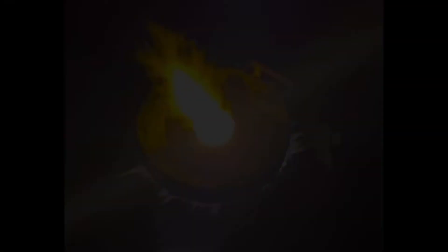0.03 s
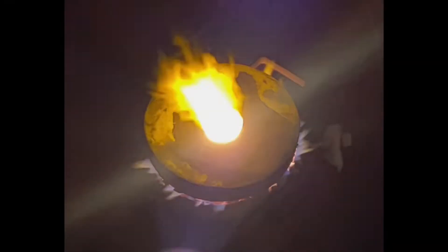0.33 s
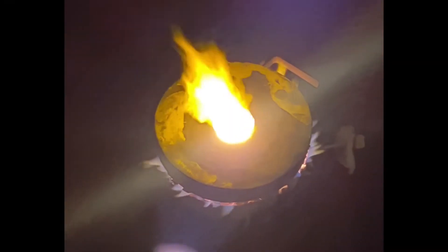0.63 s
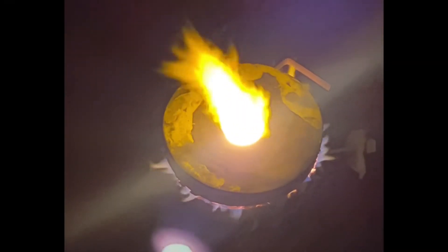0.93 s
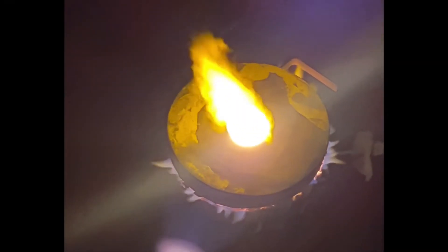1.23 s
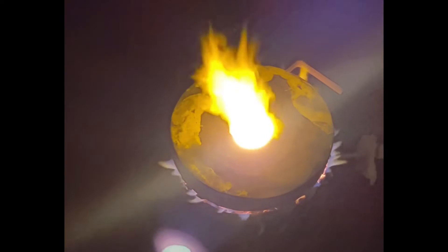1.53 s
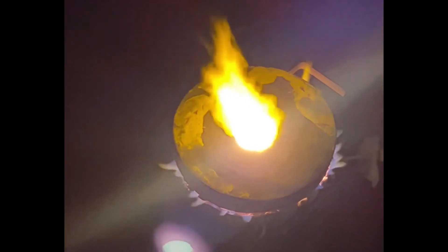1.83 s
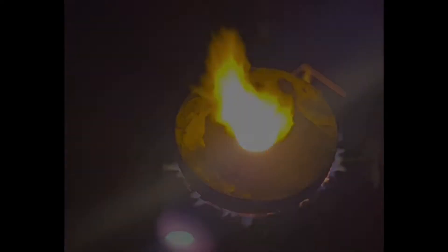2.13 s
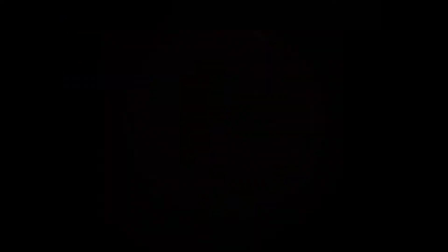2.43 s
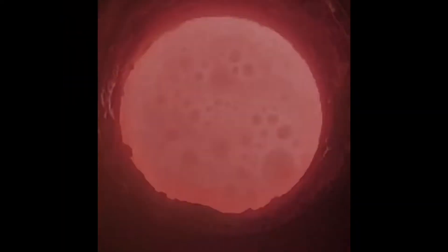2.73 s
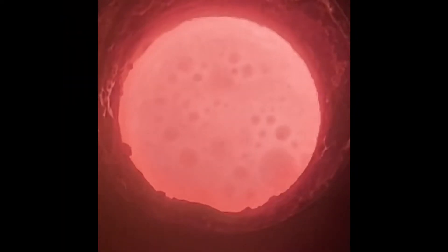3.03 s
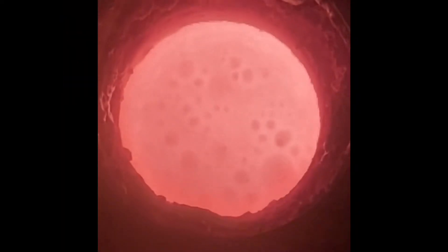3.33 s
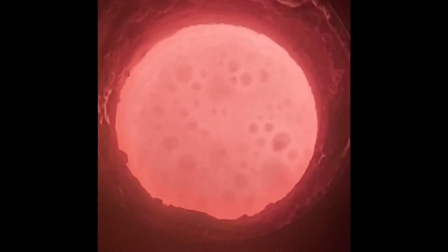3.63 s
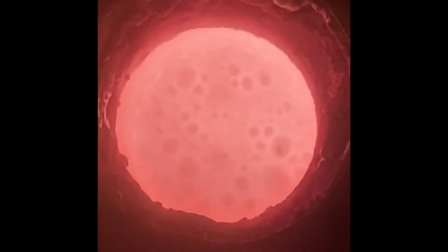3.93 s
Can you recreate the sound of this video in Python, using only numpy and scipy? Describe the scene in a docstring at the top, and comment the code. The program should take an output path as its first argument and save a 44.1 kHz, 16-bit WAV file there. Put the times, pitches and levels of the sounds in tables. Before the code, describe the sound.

A furnace flame roars in a workshop, booming and throbbing, with hissing air and a thin blower whine. Heard first beside the flame, then from above the crucible, where the roar stays strong but hiss and whine are much weaker.

```python
"""Forced-air melting furnace

A turbulent flame roars in a workshop, booming and throbbing in its chamber, while air hisses
and a motor and a blower whine at multiples of their shaft rates. It is heard first from beside
the flame; after a quick fade it is heard from over the crucible, where the roar is as strong
but hiss and whine are much weaker."""
import sys
import numpy as np
from scipy import signal
from scipy.fft import rfft, irfft
from scipy.io import wavfile
from scipy.ndimage import uniform_filter1d

SR = 44100
rng = np.random.default_rng(int(sys.argv[2]) if len(sys.argv) > 2 else 0)


def wrap_up_sound(samples):
    """Save the sound to the file named by the first command line argument, as 16-bit audio."""
    columns = np.atleast_2d(samples).T
    # keep every value between -1 and 1, then stretch to whole-number steps
    tamed = np.clip(columns, -1, 1)
    steps = np.round(tamed * 32767).astype(np.int16)
    wavfile.write(sys.argv[1], SR, steps)


N = 176400
TIME, BIN_HZ = np.arange(N) / SR, np.arange(N // 2 + 1) * SR / N
BESIDE, ABOVE = 0, 1  # listening places: beside the flame, above the crucible
LEFT_RIGHT = np.array([[1], [-1]])


def undb(db):
    """Decibels to gain."""
    return 10 ** (np.asarray(db) / 20)


def fader(rows):
    """Gain that rides straight lines between (seconds, dB) points."""
    return undb(np.interp(TIME, *np.array(rows).T))


def swell(rows):
    """A fader ride scaled to unit mean power between its first and last points."""
    gain = fader(rows)
    start, end = int(rows[0][0] * SR), int(rows[-1][0] * SR)
    return gain / np.sqrt(np.mean(gain[start:end] ** 2))


def across_spectrum(table, column=1):
    """Spread a table column over all frequencies, on a log axis."""
    rows = np.array(table)
    return np.interp(np.log(BIN_HZ + 1), np.log(rows[:, 0]), rows[:, column])


def drift(rate_hz):
    """Smooth random motion with a spread of 1, taking rate_hz new values a second."""
    hold = int(SR / rate_hz)
    steps = np.repeat(rng.standard_normal(400), hold)[:N]
    smooth = uniform_filter1d(uniform_filter1d(steps, hold), hold)
    return smooth / np.std(smooth)


def colour(spectrum, eq, level_db):
    """Noise shaped by an EQ curve, falling steeply past its ends, and set to an RMS level."""
    hz = BIN_HZ + 1
    skirts = 1 / np.sqrt((1 + (eq[0][0] / hz) ** 20) * (1 + (hz / eq[-1][0]) ** 20))
    noise = irfft(spectrum * undb(across_spectrum(eq)) * skirts, N)
    return noise * undb(level_db) / np.std(noise)


# Stereo image of the flame and air at each place. Each row: frequency in Hz, phase of side
# against mid in radians, share of direct sound in the side from 0 to 1.
IMAGE_BESIDE = [(60, 1, .3), (280, -2, 0.17), (800, -0.5, 0.77), (1340, -2, 0.87), (1800, -6, 0.4),
                (2400, 4, .5), (2900, -1.5, .55), (3500, -4, .55), (6000, -4.5, .65), (10000, -4.5, .65)]
IMAGE_ABOVE = [(60, -1.5, .3), (280, -1.4, 0.46), (550, -0.7, 0.61), (800, -2, .5), (1150, -3.5, 0.45),
               (2400, -5, .7), (6000, -4.5, .55), (10000, -4.7, .6)]


def turbulence(place, mid_eq, side_eq, mid_db, side_db):
    """Turbulent noise at two ears: part arrives directly, part is scattered by the workshop."""
    image = (IMAGE_BESIDE, IMAGE_ABOVE)[place]
    direct, scattered = rfft(rng.standard_normal((2, N)))
    share = np.clip(across_spectrum(image, column=2), 0, 1)
    side = share * np.exp(1j * across_spectrum(image)) * direct + np.sqrt(1 - share ** 2) * scattered
    return colour(direct, mid_eq, mid_db) + LEFT_RIGHT * colour(side, side_eq, side_db)


def whine(place, tones, shaft_hz, waver_db):
    """Multiples of a slightly wandering shaft rate, each wavering in the moving hot air."""
    speed_hz = shaft_hz * (1 + 0.00026 * drift(rate_hz=5.02))
    shaft_angle = 2 * np.pi * np.cumsum(speed_hz) / SR
    sound = np.zeros((2, N))
    for multiple, *levels_db, lead, pan_db in tones:
        phase = multiple * shaft_angle + rng.uniform(0, 2 * np.pi) + 0.43 * drift(rate_hz=14)
        waver = undb(waver_db * drift(rate_hz=14))
        waver *= np.sqrt(2 / np.mean(waver ** 2))  # gives the wavering sine unit power
        gain = undb(levels_db[place] + LEFT_RIGHT * pan_db / 2)
        sound += gain * waver * np.sin(phase + LEFT_RIGHT * lead / 2)
    return sound


# The motor's partials. Each row: multiple of the shaft rate, level beside in dB, level above in dB,
# left ear's phase lead in radians, left minus right in dB.
MOTOR_TONES = [(14, -46.5, -55, -.9, -4), (19, -49.5, -60, -1.3, -2), (21, -43.5, -58, -1.6, -4),
               (33, -53.5, -55, .6, -3), (35, -51.5, -60.5, 1, -5), (37, -53.5, -71, 1.7, -5),
               (38, -55.5, -75, 2.2, -5), (39, -55, -74, 2.6, -4), (40, -55, -76, 2.7, -2),
               (41, -53.5, -76, 2.8, 0), (42, -53.5, -76, 2.8, 0), (46, -66, -66, 1.5, 0)]


def motor(place):
    """The spinning motor sings a thin, steady cluster of shaft harmonics."""
    return whine(place, MOTOR_TONES, shaft_hz=59.83, waver_db=2)


# The blower's partials. Each row: multiple of the shaft rate, level beside in dB, level above in dB,
# left ear's phase lead in radians, left minus right in dB.
BLOWER_TONES = [(51, -58, -68, 1.5, 0), (53, -56, -52.5, .6, 0), (55, -40.3, -69, .6, 1),
                (56, -49.5, -68, .6, 1), (57, -57.5, -78, .7, 1), (106, -68, -73, 1.6, 0),
                (109, -65, -71, 1.6, 0), (110, -57.5, -78, 1.6, 0), (111, -56, -78, 1.6, 0),
                (112, -45.8, -62, 1.7, 0), (114, -65, -74, 1.7, 0)]
# Fader rides for its whine and whistle, one list per place. Each row: time in seconds, relative dB.
WHINE_RIDE = [
    [(0.0, -4), (0.08, -1), (0.3, -1.5), (0.55, -3), (0.7, -2.5), (0.85, -1.5), (1.12, 1.5), (1.22, 0.5),
     (1.42, 0.5), (1.51, 2), (1.65, 1.2), (1.95, -0.5), (2.04, -2.5), (2.25, 3.5), (2.35, -1)],
    [(2.42, -4.5), (2.65, 1), (2.82, -1), (2.98, -1.5), (3.17, 0.5), (3.35, -3), (3.47, 2), (3.6, -3.5),
     (3.7, -2.5), (3.78, 2.5), (3.92, -7.5), (3.98, -3.5)],
]
WHISTLE_RIDE = [
    [(0.0, -6), (0.16, 3), (0.43, -7), (0.51, 3.5), (0.59, 1), (0.68, 1), (0.8, -12), (0.94, 1), (0.99, -6),
     (1.045, 9), (1.085, -6), (1.12, 8), (1.17, -1), (1.26, 2), (1.41, -9), (1.5, 3.5), (1.69, -5),
     (1.76, 5), (1.82, -2.5), (2.02, -4), (2.12, 6.5), (2.2, -7), (2.28, 8), (2.35, -4)],
    [(2.42, 0.5), (2.6, -8), (3.15, -5.5), (3.23, 5), (3.3, -1), (3.44, 3), (3.55, 0.5), (3.78, 6),
     (3.98, -11)],
]


def blower(place, shaft_hz=74.79, waver_db=1.14, split_multiple=80):
    """The blower's blades whine, with a whistle about an octave up that swells on its own."""
    lower = [row for row in BLOWER_TONES if row[0] < split_multiple]
    upper = [row for row in BLOWER_TONES if row[0] > split_multiple]
    blades = whine(place, lower, shaft_hz, waver_db) * swell(WHINE_RIDE[place])
    whistle = whine(place, upper, shaft_hz, waver_db) * swell(WHISTLE_RIDE[place])
    return blades + whistle


def metal_reflections(sound, echo_db=-12.5, decay_s=0.0072):
    """Early reflections off nearby metal add a hollow, rippled colour."""
    tail = rng.standard_normal(N) * np.exp(-TIME / decay_s)
    response = 1 + undb(echo_db) * rfft(tail / np.linalg.norm(tail))
    return irfft(rfft(sound) * response, N) / np.sqrt(1 + undb(echo_db) ** 2)


# Mid and side EQ of the hiss at each place. Each row: frequency in Hz, relative level in dB.
HISS_MID_BESIDE = [(900, -65.5), (1300, -69.5), (1450, -64.5), (1650, -70), (2000, -72), (2350, -77),
                   (2700, -85), (2950, -72), (3500, -71.5), (3700, -76.5), (4200, -78.5), (4700, -80),
                   (5450, -75), (6400, -74), (7500, -79), (8400, -75.5), (9200, -83), (10200, -83.5),
                   (11200, -97), (12500, -110)]
HISS_SIDE_BESIDE = [(900, -73), (1300, -72), (1470, -72.5), (1680, -79.5), (2100, -83), (2500, -73),
                    (2750, -77), (3050, -71), (3500, -73.5), (3800, -76.5), (4400, -77), (4850, -71),
                    (5200, -91), (6500, -82), (8300, -81.5), (9200, -81), (10100, -85.5), (11500, -88.5),
                    (15500, -89.5)]
HISS_MID_ABOVE = [(900, -69), (1150, -77), (1320, -80.5), (1500, -76.5), (1750, -77.5), (1980, -73),
                  (2120, -86), (2250, -90), (2550, -90), (2750, -84.5), (2950, -87), (3400, -80),
                  (3750, -88.5), (4200, -90.5), (4450, -97), (5250, -96.5), (5550, -83.5), (5850, -98),
                  (6500, -92), (7500, -95.5), (8400, -92), (9100, -102), (12500, -114)]
HISS_SIDE_ABOVE = [(900, -75.5), (1450, -81.5), (1650, -88.5), (1980, -94), (2300, -99), (3300, -91.5),
                   (3700, -102), (4800, -92.5), (5300, -110), (6000, -110), (6450, -99), (8300, -93.5),
                   (9200, -100), (15500, -107)]


def air_hiss(place, flutter_db=1):
    """Rushing air makes a bright, lightly fluttering hiss that bounces off the metal."""
    if place == BESIDE:
        hiss = turbulence(place, HISS_MID_BESIDE, HISS_SIDE_BESIDE, mid_db=-35.5, side_db=-35)
    else:
        hiss = turbulence(place, HISS_MID_ABOVE, HISS_SIDE_ABOVE, mid_db=-45, side_db=-50)
    return metal_reflections(hiss) * undb(flutter_db * drift(rate_hz=14))


# Bursts of combustion. Each row: centre in seconds, length in seconds, pitch in Hz, peak level in dB.
BURSTS = [(0.282, 0.093, 281, -9.5), (.411, 0.032, 280, -5), (0.519, 0.026, 314, -4),
          (0.697, 0.054, 283.5, -7.5), (0.815, .06, 286, -7.5), (0.858, 0.052, 262, -8.5),
          (0.923, 0.044, 314, -9.5), (0.988, .055, 259, -9), (1.201, .065, 268.4, -7.5),
          (1.534, 0.089, 255, -10), (1.821, 0.059, 255, -10), (1.946, 0.043, 302, -9),
          (2.641, 0.057, 291, -7.5), (2.686, 0.069, 266.5, -6.5), (2.808, .075, 321, -9),
          (2.923, 0.11, 279.4, -8.5), (3.082, 0.048, 306, -7.5), (3.165, 0.046, 312, -10),
          (3.24, 0.069, 276, -6.5), (3.399, 0.055, 309, -8), (3.672, 0.073, 272.6, -8.5),
          (3.804, 0.063, 272, -8), (3.965, 0.073, 312, -12.5)]


def throbbing(boom, duck_depth=0.24):
    """In each burst the flame locks on to a chamber resonance, which rings as the noisy boom ducks."""
    wobble = 0.3 * drift(rate_hz=78)  # radians
    phases = rng.uniform(0, 2 * np.pi, len(BURSTS))
    ring, locked = np.zeros(N), np.zeros(N)
    for (centre, length, hz, db), phase in zip(BURSTS, phases):
        active = np.abs(TIME - centre) < length / 2
        t = TIME[active] - centre
        hump = np.cos(np.pi * t / length) ** 2
        ring[active] += undb(db) * hump * np.sin(2 * np.pi * hz * t + phase + wobble[active])
        locked[active] += hump
    return boom * (1 - np.clip(duck_depth * locked, 0, 1)) + ring


# The flame's surges, as a fader ride on the boom. Each row: time in seconds, gain in dB.
BOOM_RIDE = [(0, -3.5), (.05, 3.5), (.1, -6.5), (.2, -1.5), (.33, 1), (.46, -4), (.58, -1.5), (.64, -4.5),
             (.68, -2.5), (1.05, -1), (1.15, -4.5), (1.22, -1.5), (1.35, -3), (1.43, -2), (1.62, -0.5),
             (1.9, -1.5), (2.35, -1), (2.48, -0.5), (2.55, -4.5), (2.62, 0.5), (2.76, 1.5), (2.88, -3),
             (2.97, 1), (3.04, -6), (3.11, -1), (3.34, -2.5), (3.46, -1), (3.62, -4), (3.73, 0),
             (3.87, -3.5), (3.98, -1)]


def chamber_boom(band, window_s=0.047):
    """The chamber booms: a band of the roar is levelled, then follows the flame's surges and throbs."""
    power = uniform_filter1d(band[0] ** 2, int(window_s * SR))
    power = uniform_filter1d(power, int(window_s * SR / 2))
    steady = band * np.sqrt(np.mean(power) / power)
    return throbbing(steady * fader(BOOM_RIDE))


# Mid and side EQ of the roar at each place. Each row: frequency in Hz, relative level in dB.
ROAR_MID_BESIDE = [(25, -37), (41, -25), (60, -15), (85, -10.5), (101, -10.5), (122, -5.5), (165, -8.5),
                   (200, -0.1), (228, -8), (260, 1), (278, -2), (315, -2), (355, -10), (425, -17),
                   (460, -13.5), (510, -22), (580, -21.5), (700, -30.5), (820, -31)]
ROAR_SIDE_BESIDE = [(25, -13), (40, -21), (90, -14.5), (155, -3), (195, -3), (280, 8.5), (380, -10.5),
                    (440, -6), (490, -20), (570, -13), (680, -13.5), (820, -13)]
ROAR_MID_ABOVE = [(25, -36.5), (64, -15), (98, -15.5), (128, -6), (175, -8.5), (200, -2.5), (235, -2),
                  (262, 0), (320, -1), (366, -10.5), (413, -11.5), (479, -20), (549, -19), (700, -37.5),
                  (820, -36)]
ROAR_SIDE_ABOVE = [(25, -16), (45, -21), (75, -20), (110, -16.5), (150, -13), (210, -2.5), (310, 3),
                   (420, -3.5), (500, -15), (580, -8), (700, -24), (820, -20.5)]
# The flame's flares, as a fader ride on the deepest rumble. Each row: time in seconds, gain in dB.
RUMBLE_RIDE = [(0.0, -8), (0.16, 11), (0.41, -5), (0.51, -15), (0.96, 2), (1.2, -5), (1.35, -4),
               (1.61, -7.3), (1.73, 4), (2.02, 15.5), (2.22, -2), (2.63, 7), (2.88, -3), (3.0, -0.5),
               (3.31, -12), (3.98, -3)]


def flame(place, rumble_top_hz=62.5, boom_band_hz=(185, 395), flutter_db=1):
    """The turbulent flame roars: its low end swells as it flares, its low mids boom, the rest flutters."""
    if place == BESIDE:
        roar = turbulence(place, ROAR_MID_BESIDE, ROAR_SIDE_BESIDE, mid_db=-12, side_db=-31.5)
    else:
        roar = turbulence(place, ROAR_MID_ABOVE, ROAR_SIDE_ABOVE, mid_db=-12, side_db=-27)
    lowpasses = [1 / (1 + (BIN_HZ / edge_hz) ** 8) for edge_hz in (rumble_top_hz, *boom_band_hz)]
    rumble, below_boom, through_boom = (irfft(rfft(roar) * lowpass, N) for lowpass in lowpasses)
    boom_band = through_boom - below_boom
    boom = chamber_boom(boom_band)
    rush = (roar - rumble - boom_band) * undb(flutter_db * drift(rate_hz=25))
    return rumble * fader(RUMBLE_RIDE) + boom + rush


def furnace(place):
    """Flame, rushing air, blower and motor from one listening place."""
    return flame(place) + air_hiss(place) + blower(place) + motor(place)


def scene():
    """The sound beside the flame fades out, then the sound above the crucible fades in."""
    change_s, fade_out_s, fade_in_s = 2.386, 0.039, 0.02
    fade_out = np.clip((change_s - TIME) / fade_out_s, 0, 1)
    fade_in = np.clip((TIME - change_s) / fade_in_s, 0, 1) ** 0.95
    return furnace(BESIDE) * fade_out + furnace(ABOVE) * fade_in


def record(dry):
    """A soft clip rounds the highest peaks and a steep low-pass cuts the top."""
    rounded = dry / (1 + dry ** 8) ** (1 / 8)
    top_hz = 15700
    return signal.sosfilt(signal.ellip(10, .2, 80, top_hz, fs=SR, output="sos"), rounded)


dry = scene()
out = record(dry)
wrap_up_sound(out)
```